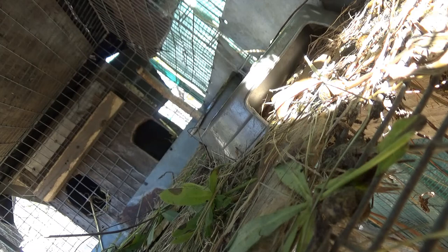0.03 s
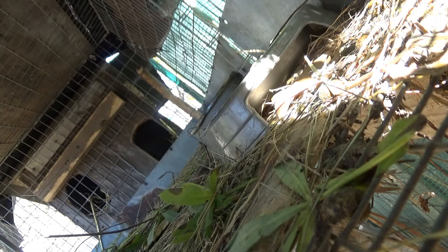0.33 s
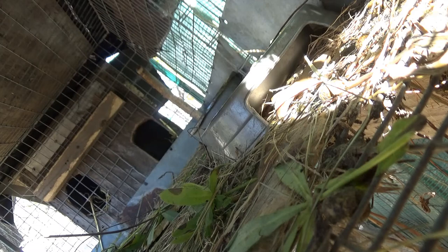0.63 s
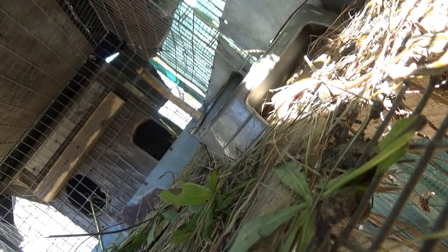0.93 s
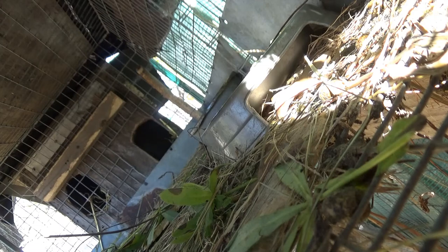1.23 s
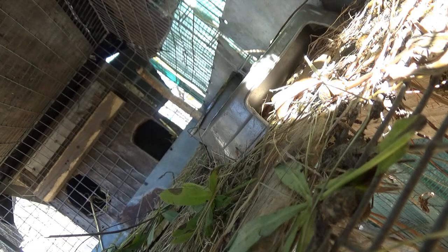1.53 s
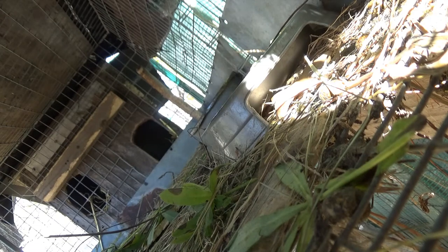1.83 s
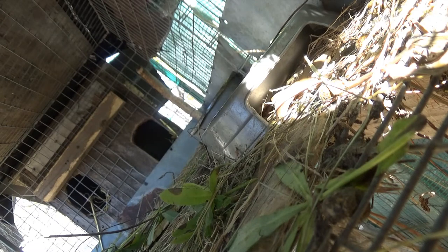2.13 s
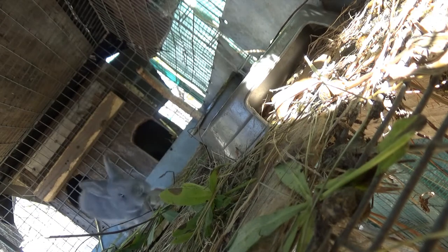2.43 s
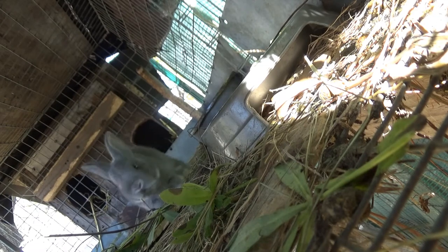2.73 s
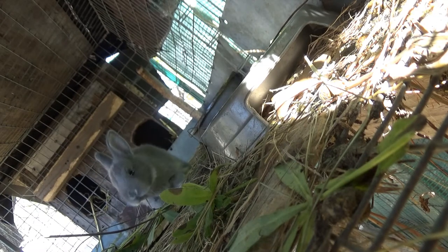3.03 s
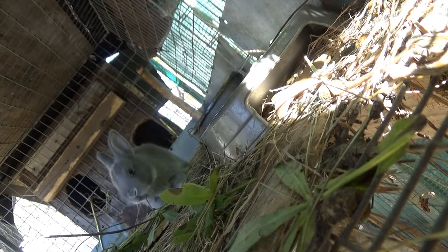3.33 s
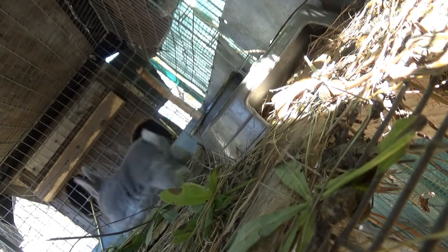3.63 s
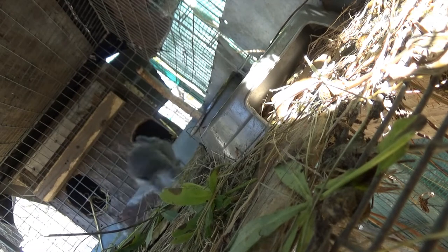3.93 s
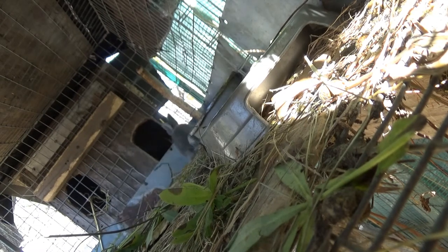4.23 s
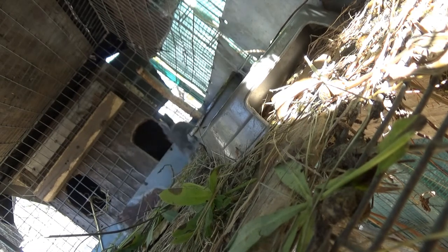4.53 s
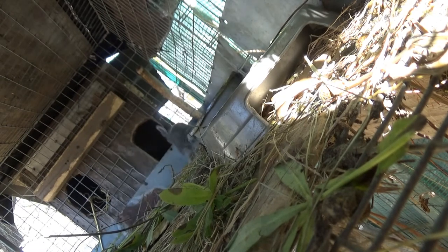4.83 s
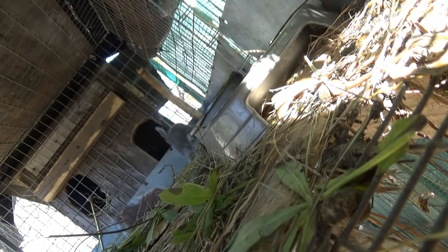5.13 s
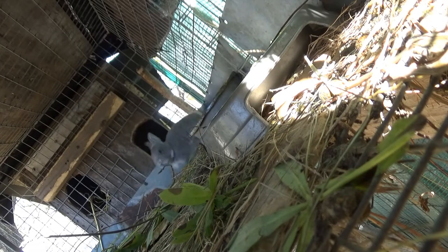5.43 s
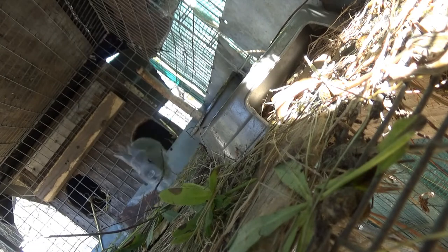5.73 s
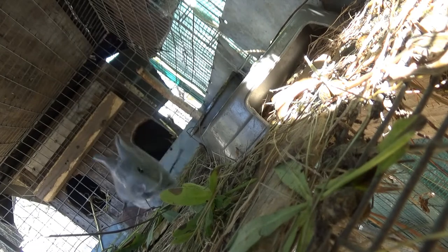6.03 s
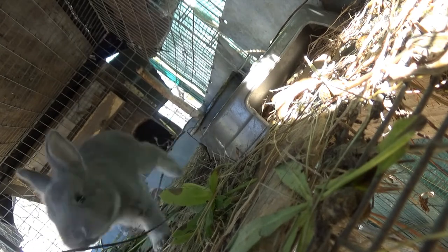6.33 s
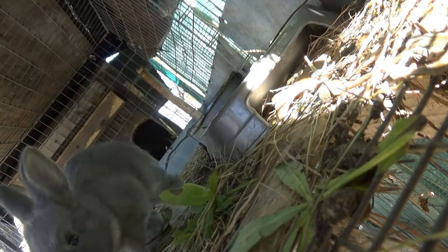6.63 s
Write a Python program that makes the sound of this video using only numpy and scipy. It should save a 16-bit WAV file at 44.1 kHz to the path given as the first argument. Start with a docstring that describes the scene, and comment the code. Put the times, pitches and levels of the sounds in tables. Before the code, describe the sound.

Dry hay crackles and stalks snap in three short bouts as a small rabbit hops around its hutch close to the microphone. The first bout is light; the second and third add sharp knocks on a tray, soft thuds and claw ticks on wood. In the gaps there is a low wash of outdoor air, a barely audible engine drone and, briefly, the faint ticking of a small motor.

```python
"""Dry hay crackles under a young rabbit that hops about a small wooden hutch in three bouts.
Each push of a paw breaks a swarm of fibres, whose impulses merge into noise; single stalks snap.
Its feet excite the resonances of a tray and the floor boards, claws and stems tick on wood,
and one tiny squeak sounds near the end. Behind are an even wash of outdoor air, the harmonic
drone of a far engine and the faint ticking of a small motor."""
import sys
import numpy as np
from scipy import signal
from scipy.fft import rfft, irfft, next_fast_len
from scipy.io import wavfile
from scipy.ndimage import uniform_filter1d

SR = 44100
rng = np.random.default_rng(int(sys.argv[2]) if len(sys.argv) > 2 else 0)


def generate_wav(signal):
    """Clip the signal to [-1, 1] and save it as 16-bit WAV at the path in sys.argv[1]."""
    frames = np.transpose(np.atleast_2d(signal))
    scaled = np.clip(frames, -1, 1) * 32767
    pcm = np.round(scaled).astype(np.int16)
    wavfile.write(sys.argv[1], SR, pcm)


N = 299880
TIME = np.arange(N) / SR

# Paw pushes through the hay. Each row: start in seconds, length in seconds, crackle level in dB.
PAW_PUSHES = [(0.818, 0.089, -56), (1.41, 0.038, -53.5), (2.08, 0.034, -42.5), (2.156, 0.039, -42),
              (2.216, 0.092, -46.5), (2.361, 0.036, -45), (2.441, .021, -49), (2.493, .05, -40),
              (2.604, 0.037, -43.5), (2.744, 0.019, -49.5), (2.802, 0.013, -51), (3.484, 0.022, -38),
              (3.529, 0.035, -46), (3.624, .014, -42), (3.648, 0.045, -27.5), (3.743, 0.048, -37.5),
              (3.818, 0.015, -30.5), (3.847, 0.039, -24), (3.923, 0.017, -31), (3.948, 0.024, -36.5),
              (4.004, .043, -34.5), (4.101, .03, -32), (4.16, 0.063, -36.5), (4.288, 0.023, -51),
              (5.341, 0.038, -44.5), (5.445, .049, -30.5), (5.545, .02, -41), (5.676, 0.049, -40.5),
              (5.79, 0.043, -46), (5.911, 0.025, -39.5), (5.999, .02, -46), (6.035, .028, -43.5),
              (6.115, 0.054, -38.5), (6.192, .01, -41), (6.247, 0.031, -42), (6.35, 0.035, -47.5),
              (6.755, .04, -53)]
# The body stirring the hay. Each row: start, busiest moment and end in seconds, level in dB.
STIRRING_BOUTS = [(2.05, 2.13, 2.88, -47), (3.5, 3.88, 4.23, -41.5), (5.413, 5.52, 6.58, -41.5)]
# Weight of the paws on the mat of hay. Each row: time in seconds, crush relative to crackle in dB.
PAW_WEIGHT = [(2.15, -5), (2.55, -12.5), (3.7, -12), (4.2, -5.5), (5.45, -5), (5.95, -17), (6.3, -7.5)]
# The loudest stalks breaking. Each row: time in seconds, level in dB, treble edge in dB.
STALK_SNAPS = [(.828, -46, -13), (1.015, -43.5, -10), (1.325, -49.5, -10), (1.459, -47, -3),
               (2.167, -30, -8), (2.27, -41, -7), (2.3615, -36, -1), (2.419, -33.5, -10), (2.5036, -32, -5),
               (2.606, -36.5, -9), (2.83, -40.5, 0), (3.484, -36.5, -6), (3.522, -21.5, 3.5),
               (3.6654, -14, 19), (3.68, -17.5, 1), (3.7202, -22.5, 1.5), (3.79, -27.5, -7),
               (3.851, -27, -6), (3.928, -30, -9), (4.009, -30, -9), (5.063, -49, -12), (5.421, -28, 3),
               (5.4358, -22.5, 0), (5.468, -24, -7), (5.613, -23.5, -15), (5.917, -33, -6), (6.135, -31, 3),
               (6.204, -32, -7), (6.274, -30.5, -7), (6.326, -37, 11), (6.362, -39, -2), (6.478, -36, -6),
               (6.516, -31, 2), (6.539, -40, 6), (6.55, -35, 7), (6.786, -38, 17)]
# Spectra of top fibres, crushed mat and snapping stalks. Each row: frequency in Hz, relative gain in dB.
FIBRE_SPECTRUM = [(300, -63), (1500, -27), (3000, -24), (4500, -6), (6500, -2.5), (8500, 1.5), (10200, 2),
                  (12000, -4), (14000, -5.5), (16000, -17)]
MAT_SPECTRUM = [(100, -51), (280, -9), (520, 2), (850, -4), (1250, -1.5), (2200, -1), (3500, -1.5),
                (5500, -8), (9000, -12), (16000, -61)]
STALK_SPECTRUM = [(300, -22), (1500, -3.5), (3000, -2), (5000, 1), (8000, 6), (10500, 7.5), (13000, -11.5),
                  (16000, -16)]
# Feet striking the tray. Each row: time in seconds, level in dB, pitch of the struck spot in Hz.
TRAY_KNOCKS = [(3.503, -37.5, 2200), (3.653, -24.5, 1240), (3.656, -26, 2000), (3.872, -21, 2490),
               (3.873, -23.5, 1190), (3.878, -21, 1440), (3.927, -35, 1420), (4.037, -28.5, 1360),
               (4.074, -36, 1380), (4.128, -25, 1850), (4.185, -30, 990), (4.229, -29, 1350),
               (5.366, -42, 2200), (5.4382, -32, 2400), (5.457, -19, 2060), (5.458, -27.5, 2970),
               (5.472, -37, 2030), (5.549, -37.5, 1290), (5.615, -34.5, 2150)]
# Normal modes of the tray. Each row: frequency in Hz, bandwidth in Hz, relative gain in dB.
TRAY_MODES = [(559, 38, 10.5), (1240, 42, -2), (1617, 50, -3), (2060, 83, -4.5), (2334, 61, -8),
              (2800, 56, -23), (2820, 50, -22), (3400, 110, -5), (3520, 55, -9), (4100, 41, -26)]
# Soft landings on the boards. Each row: time in seconds, level in dB, pitch in Hz.
LANDINGS = [(2.369, -42.5, 560), (2.511, -42.5, 507), (3.753, -40.5, 540), (3.8235, -30.5, 537),
            (4.1856, -34, 590), (5.439, -38, 540), (5.868, -44.5, 530), (5.96, -45, 510),
            (6.042, -44.5, 430), (6.26, -43, 297), (6.36, -45, 510)]
# Claws and stems tapping wood. Each row: time in seconds, level in dB, pitch in Hz.
WOOD_TICKS = [(.443, -46, 2680), (1.013, -43.5, 1980), (1.206, -49.5, 2980), (2.692, -33, 1800),
              (3.073, -48.5, 1500), (4.5798, -42, 3400), (6.327, -44.5, 2920), (6.3606, -42, 1700)]
# Uneven runs of small ticks. Each row: start and end in seconds, mean level in dB, mean pitch in Hz.
WOOD_TICK_RUNS = [(1.375, 1.76, -46.5, 1830), (6.239, 6.58, -43.5, 1210)]
# Spectrum of the outdoor air. Each row: frequency in Hz, relative gain in dB.
AIR_SPECTRUM = [(15, -67), (25, -23), (59, -13), (80, -6), (157, -5), (185, -6.5), (249, -7.5), (531, -3.5),
                (754, -6), (1650, -12.5), (1940, -14), (3430, -18), (3920, -20), (8140, -20.5),
                (16000, -26.5)]
# Slow course of the outdoor air. Each row: time in seconds, level in dB.
AIR_ENVELOPE = [(0, -51), (1, -51), (2, -50.5), (3.3, -50), (4.4, -48.5), (5.3, -50), (6.2, -47.5),
                (6.8, -47)]
# Swells of the engine's overtones. Each row: start and end in seconds, harmonic number, level in dB.
ENGINE_SWELLS = [(.2, .65, 4, -58), (1.12, 1.578, 2, -56.5), (2.9, 3.3, 4, -64), (3.05, 3.6, 3, -63),
                 (3.55, 3.9, 4, -61.5), (3.97, 4.25, 2, -60), (4.9, 5.95, 4, -62.5), (6.47, 6.8, 3, -60.5)]
# Stereo width across the spectrum. Each row: frequency in Hz, gain of the side signal in dB.
SIDE_SPECTRUM = [(60, -35), (125, -45), (250, -16.5), (500, -11.5), (1000, -3), (2000, -3.5), (4000, -4),
                 (8000, -8), (12000, -20.5), (16000, -40)]


def hay(rise_share=.26, settle_s=.0094):
    """Crackling noise: countless fractures superpose, and pressure sets their amplitude."""
    body = undb(stirring(TIME) + .84 * walk(rate=24))
    paws = np.zeros(N)
    t = TIME[:SR // 2]
    for start, length, db in PAW_PUSHES:
        build = np.minimum(t / (rise_share * length), 1)
        settle = np.exp(-np.maximum(t - length, 0) / settle_s)
        add(paws, start, build * settle * undb(db))
    crackle = body + paws
    crush = body * undb(-3) + paws * undb(np.interp(TIME, *np.transpose(PAW_WEIGHT)))
    stick_slip = undb(1.5 * walk(rate=250))  # stalks catch and let go
    fibres = fractures(rate=6300, spread_db=0)
    cracks = fractures(rate=350, spread_db=3.5)
    # stalks of different thickness take turns to resonate
    stalks = sum(ring(fractures(rate=1500, spread_db=3), hz, hz / 12) * undb(1.65 * walk(rate=35))
                 for hz in np.geomspace(5200, 11500, num=8))
    top = tint(fibres + undb(-5) * cracks + undb(-6) * unit(stalks), FIBRE_SPECTRUM)
    top = shifting_straw(top, rate=35, depth_db=2)
    mat = tint(fractures(rate=5000, spread_db=0), MAT_SPECTRUM)
    return stick_slip * (crackle * top + crush * mat)


def fractures(rate, spread_db):
    """A Poisson process: fibres break independently, on average `rate` times a second."""
    sizes = undb(spread_db * np.minimum(rng.exponential(size=N), 5))
    breaking = rng.random(N) < rate / SR
    return unit(breaking * sizes * rng.choice([-1, 1], N))


def stirring(t, rise_db=16.5, fade_db_per_s=13, release_db_per_s=132):
    """Exponential growth and decay: the level in dB of the hay under the body, bout by bout."""
    levels = []
    for start, busiest, end, db in STIRRING_BOUTS:
        rise_left = np.maximum(busiest - t, 0) / max(busiest - start, .01)
        fading_s = np.maximum(t - busiest, 0)
        outside_s = np.maximum(t - end, 0) + np.maximum(start - t, 0)
        levels.append(db - rise_db * rise_left - fade_db_per_s * fading_s - release_db_per_s * outside_s)
    return np.max(levels, axis=0)


def shifting_straw(x, rate, depth_db):
    """Amplitude modulation: three bands swell independently as the paw meets different straw."""
    low = signal.sosfiltfilt(signal.butter(2, 7000, fs=SR, output="sos"), x)
    high = signal.sosfiltfilt(signal.butter(2, 11500, "high", fs=SR, output="sos"), x)
    return unit(sum(band * undb(depth_db * walk(rate)) for band in (low, x - low - high, high)))


def snaps(rows):
    """Brittle fracture: a stalk gives an impulse, then splinters, more briefly the keener its edge."""
    out = np.zeros(N)
    for s, db, edge_db in rows:
        crack = burst(t60=.021 * 2 ** (-edge_db / 21))
        crack[0] += 4
        edge = ring(ring(crack, 13300, 5000), 13300, 5000)
        add(out, s, peak(crack + undb(edge_db + 4.5) * edge, db))
    return tint(out, STALK_SPECTRUM)


def small_snaps(count=160, per_s=12):
    """Poisson arrivals: thin stalks give way, as loudly as the hay is stirred. Rows like STALK_SNAPS."""
    times = np.cumsum(rng.exponential(size=count)) / per_s
    size, edge = rng.standard_normal((count, 2)).T
    level_db = stirring(times) + 5.5 + 1.8 * size
    edge_db = -8 + 5 * edge
    return [row for row in zip(times, level_db, edge_db) if row[0] < TIME[-1]]


def knocks():
    """Modal vibration: a foot strikes and rattles one spot of the tray, whose modes ring on."""
    out = np.zeros(N)
    for s, db, hz in TRAY_KNOCKS:
        contact = undb(-24.5) * burst(t60=.076)
        contact[0] += 1
        width_hz = 530 * 2 ** ((-20.5 - db) / 14)  # a softer knock is less pitched
        blow = ring(ring(contact, hz, width_hz), hz, hz * 1.9)
        modes = sum(undb(gain_db) * ring(blow, f, width) for f, width, gain_db in TRAY_MODES)
        add(out, s, peak(blow + undb(8) * modes, db))
    return out


def thuds(hard_knock_db=-29, board_hz=535):
    """Forced vibration: soft pads and hard knocks drive a dull board resonance over a lower body."""
    out = np.zeros(N)
    under_knocks = [(s, -42 + .4 * (db - hard_knock_db), board_hz)
                    for s, db, _ in TRAY_KNOCKS if db > hard_knock_db]
    for s, db, hz in LANDINGS + under_knocks:
        pad = burst(t60=.075 * 2 ** ((-35 - db) / 4.5))  # a softer landing lasts longer
        board = ring(ring(pad, hz, hz * .22), hz, hz * 2.5)
        body = ring(ring(pad, 420, 220), 350, 400)
        add(out, s, peak(board + undb(-13.5) * body, db))
    return out


def ticks(rows):
    """Impulse response: a hard tap with a little chatter excites a damped resonance of the wood."""
    out = np.zeros(N)
    for s, db, hz in rows:
        tap = undb(-15) * burst(t60=.041)
        tap[0] += 1
        wood = ring(ring(tap, hz, hz * .44), hz, hz * 4.1)
        add(out, s, peak(wood + undb(-31) * tap, db))
    return out


def tick_runs(gap_s=.075, jitter_s=.005, spread_db=1.5, spread_octaves=.072):
    """Jitter: successive ticks scatter in time, level and pitch. Rows like WOOD_TICKS."""
    rows = []
    for start, end, db, hz in WOOD_TICK_RUNS:
        for s, (late, size, spot) in zip(np.arange(start, end, gap_s), rng.standard_normal((20, 3))):
            rows.append((s + jitter_s * late, db + spread_db * size, hz * 2 ** (spread_octaves * spot)))
    return rows


def squeak(start_s, length_s, hz, fall_share, partials_db):
    """A harmonic glide: the partials of a tiny squeak slide down together."""
    progress = np.linspace(0, 1, int(length_s * SR))
    phase = 2 * np.pi * np.cumsum(hz * (1 - fall_share * progress)) / SR
    tone = sum(undb(db) * np.sin(k * phase) for k, db in enumerate(partials_db, start=1))
    out = np.zeros(N)
    add(out, start_s, np.sin(np.pi * progress) ** 2 * tone)
    return out


def hutch(x, t60):
    """Reverberation: close walls return dense reflections, an impulse response of unit energy."""
    tail = np.concatenate([np.zeros(24), burst(t60)])
    return signal.fftconvolve(x, tail / np.sqrt(np.sum(tail ** 2)))[:N]


def outdoors(firing_hz=46.47):
    """Continuous and line spectra: a wash of air lies over harmonics of a far engine's firing rate."""
    air = unit(tint(rng.standard_normal(N), AIR_SPECTRUM))
    air *= undb(np.interp(TIME, *np.transpose(AIR_ENVELOPE)) + .5 * walk(rate=8.1))
    air += undb(1) * ring(air, 1273, 38)  # faint resonance of the enclosure
    phase = 2 * np.pi * np.cumsum(firing_hz * (1 + .0084 * walk(rate=4))) / SR
    return air + sum(engine_overtone(harmonic, phase) for harmonic in (2, 3, 4))


def engine_overtone(harmonic, phase, hum_db=-68, ramp_s=.075):
    """Addition of powers: a wavering hum and its occasional swells make one line of the drone."""
    level = unit(undb(3 * walk(rate=4.5))) * undb(hum_db)
    for start, end, swelling_harmonic, db in ENGINE_SWELLS:
        if swelling_harmonic == harmonic:
            swell = np.interp(TIME, [start - ramp_s, start, end, end + ramp_s], [0, 1, 1, 0])
            level = np.hypot(level, undb(db) * swell)
    return level * unit(np.sin(harmonic * phase))


def motor(start_s=4.607, steps=22, steps_per_s=30):
    """Periodic excitation: a whining motor rings one mode each step, a higher one every second step."""
    out = np.zeros(N)
    for k in range(steps):
        s = start_s + k / steps_per_s
        add(out, s + .003, peak(ring(ring(burst(t60=.03), 2780, 220), 2780, 500), db=-56.5))
        if k % 2 == 0:
            add(out, s - .001, peak(ring(ring(burst(t60=.018), 3480, 350), 3480, 600), db=-54.5))
    running = np.interp(TIME, [4.55, 4.65, 5.1, 5.35], [0, 1, 1, 0])
    whine = unit(ring(ring(rng.standard_normal(N), 13170, 70), 13170, 70))
    return out + undb(-74) * running * whine


def ring(x, hz, width_hz):
    """A second-order resonator with gain 1 at its centre."""
    quality = hz / min(width_hz, SR / 4)
    return signal.lfilter(*signal.iirpeak(min(hz, SR / 2 - 2000), quality, fs=SR), x)


def burst(t60, size=16384):
    """Exponential decay: noise that falls by 60 dB in t60 seconds."""
    return rng.standard_normal(size) * undb(-60 * np.arange(size) / SR / max(t60, .002))


def walk(rate):
    """Slow noise: a wander through `rate` Gaussian values a second, with a spread near 1."""
    knots = rng.standard_normal(4096)
    return np.interp(TIME * rate, np.arange(len(knots)), knots)


def tint(x, points, keep_power=True):
    """A minimum-phase filter through (Hz, dB) points, by default keeping the power of white noise."""
    size = next_fast_len(N + 4096)
    hz, db = np.transpose(points)
    bin_hz = np.arange(size // 2 + 1) * SR / size
    gain = undb(np.interp(np.log(bin_hz + 1), np.log(hz), db))
    cepstrum = irfft(np.log(unit(gain) if keep_power else gain), size)
    cepstrum[1:size // 2] *= 2  # folding onto positive time makes the filter causal
    cepstrum[size // 2 + 1:] = 0
    return irfft(rfft(x, size) * np.exp(rfft(cepstrum)), size)[:N]


def peak(x, db, size=132):
    """Short-time rms: set the level of the loudest three milliseconds."""
    return x * undb(db) / np.sqrt(uniform_filter1d(x ** 2, size, mode="constant").max())


def undb(db):
    """The decibel law: level to amplitude ratio."""
    return 10 ** (np.asarray(db) / 20)


def unit(x):
    """Normalisation to rms 1."""
    return x / np.sqrt(np.mean(x ** 2))


def add(track, s, sound):
    """Superposition: mix a short sound into a track at s seconds."""
    i = max(int(s * SR), 0)
    track[i:i + len(sound)] += sound[:max(N - i, 0)]


def scene():
    """Decorrelation gives width: direct sound is central, scattered sound later and unlike each side."""
    breaks = STALK_SNAPS + small_snaps()
    taps = WOOD_TICKS + tick_runs()
    direct = hay() + snaps(breaks) + knocks() + thuds() + ticks(taps)
    mid = direct + undb(-8.5) * hutch(direct, t60=.038) + outdoors() + motor()
    mid += squeak(start_s=6.683, length_s=.022, hz=1240, fall_share=.184,
                  partials_db=[-59, -44.5, -45.5, -52, -47.5, -50])
    scattered = hay() + snaps(breaks) + thuds() + undb(-5) * hutch(knocks() + ticks(taps), t60=.0093)
    delayed = np.roll(scattered, int(SR / 1500))
    side = tint(undb(-2.5) * delayed + outdoors(), SIDE_SPECTRUM, keep_power=False)
    return np.array([mid + side, mid - side])


def record(dry):
    """Band limiting: the sound fades in after a moment and is cut steeply above 16 kHz."""
    fade_in = np.clip((TIME - .118) / .029, 0, 1) ** 2
    return signal.sosfilt(signal.ellip(10, .2, 75, 16000, fs=SR, output="sos"), dry * fade_in)


dry = scene()
out = record(dry)
generate_wav(out)
```